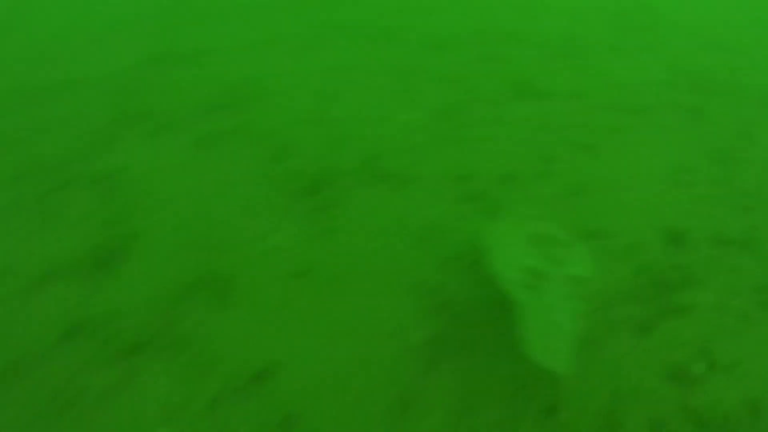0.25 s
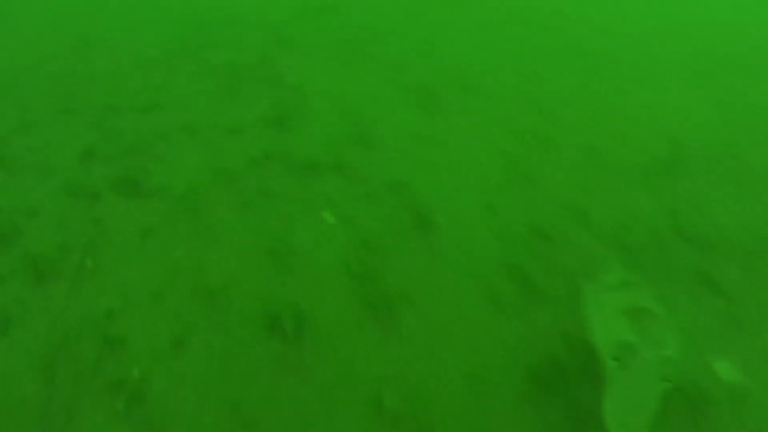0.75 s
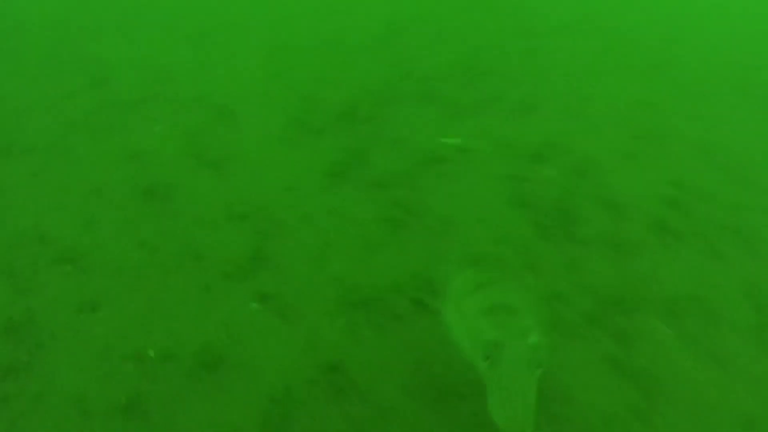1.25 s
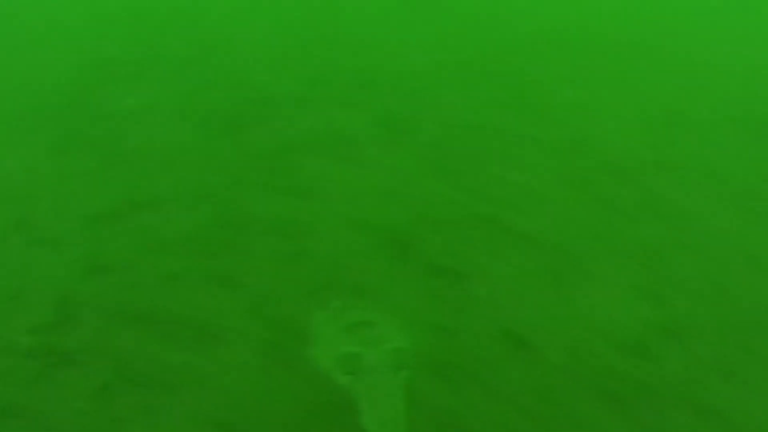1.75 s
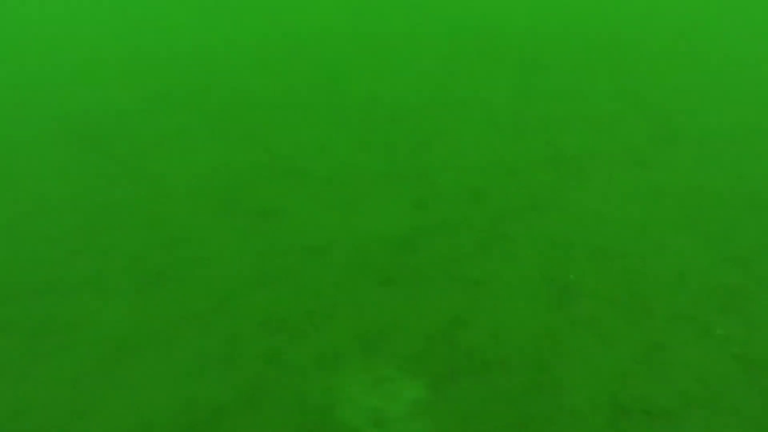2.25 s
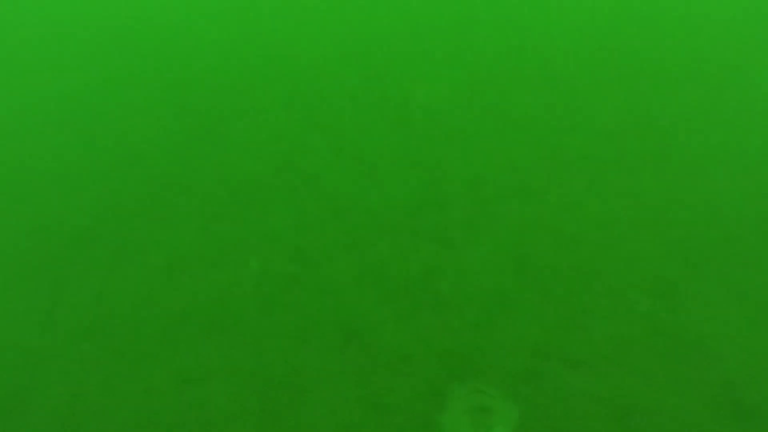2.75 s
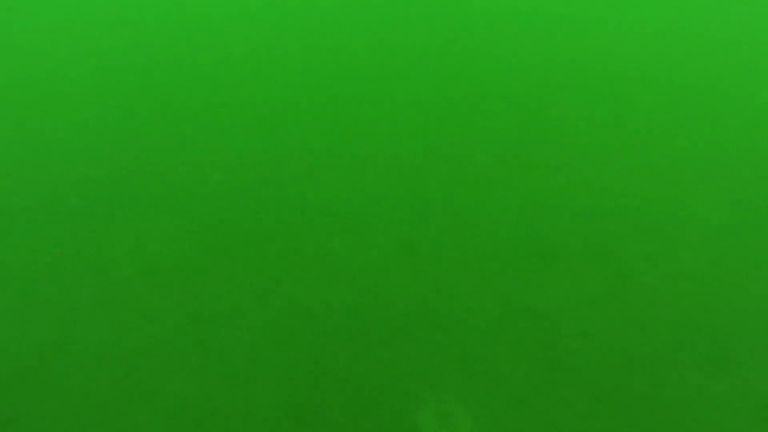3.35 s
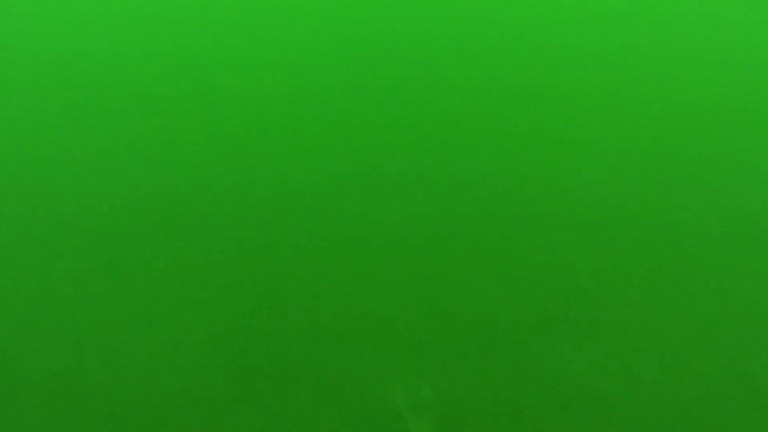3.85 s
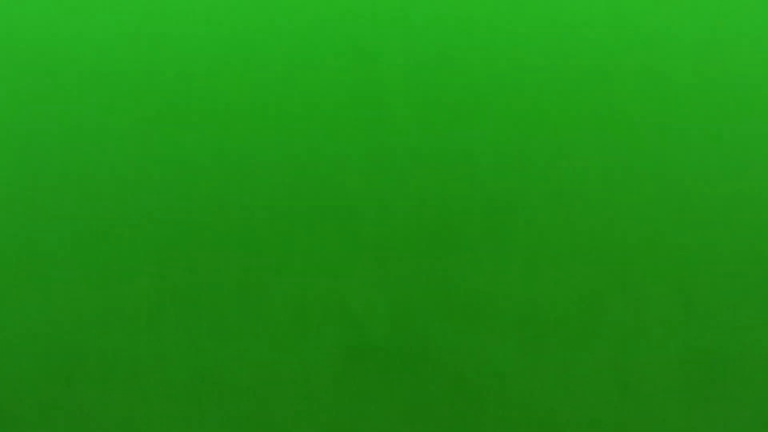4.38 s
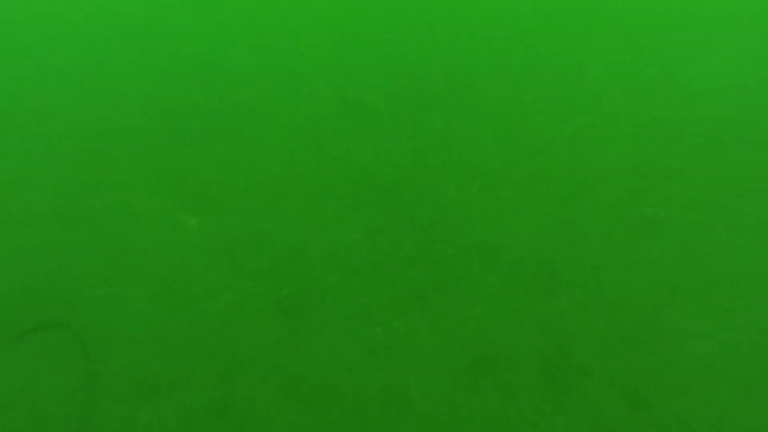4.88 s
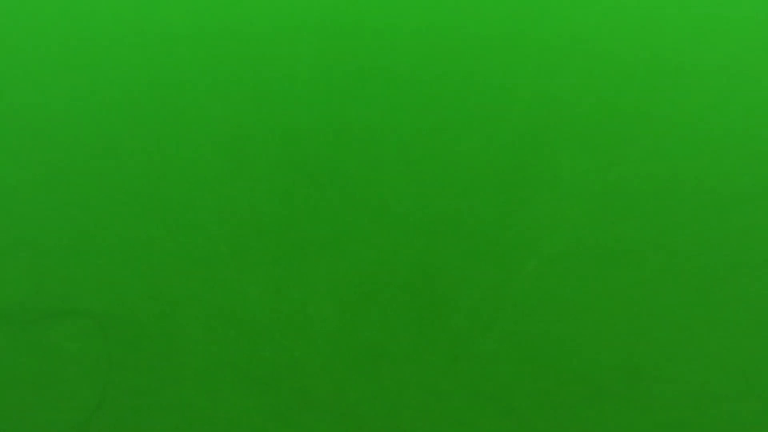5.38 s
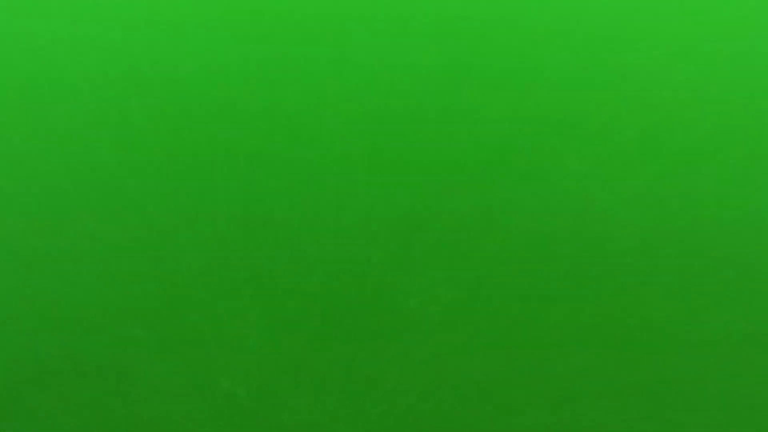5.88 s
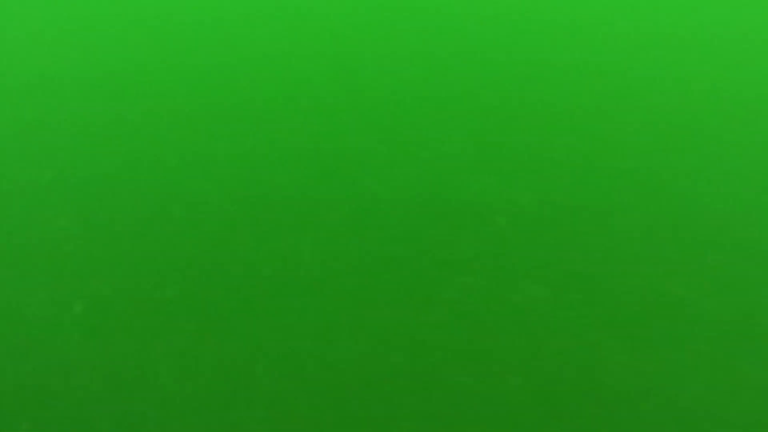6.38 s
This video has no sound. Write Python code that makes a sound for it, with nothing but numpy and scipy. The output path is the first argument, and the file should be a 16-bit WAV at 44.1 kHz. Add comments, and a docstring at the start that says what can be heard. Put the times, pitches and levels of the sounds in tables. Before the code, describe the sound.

Fast hollow diesel clatter heard beneath the sea, joined after four seconds by a rushing propeller wash that fades near the end.

```python
"""Under the sea, below a boat: from the start a six-cylinder diesel idles, each firing knocking through the hull.
It is built from short rings over noise; low tones hum along, small bright pings come and go, electronics hiss.
After four seconds a thruster propeller spins up: shaped noise churns low, and bubbles crackle above it.
It loads up, slaps and washes, is switched off just under two seconds later and fades; the diesel goes on.
Engine and propeller reach two microphones through the ringing walls of a sealed camera housing."""
import sys
import numpy as np
from scipy import signal
from scipy.fft import rfft, irfft, next_fast_len
from scipy.io import wavfile
from scipy.ndimage import map_coordinates

SR = 44100
rng = np.random.default_rng(int(sys.argv[2]) if len(sys.argv) > 2 else 0)


def log_audio(samples):
    """Write samples as a 16-bit WAV file to the path given in sys.argv[1]."""
    # one column per channel
    frames = np.atleast_2d(samples).T
    # limit to full scale, then quantise
    limited = np.clip(frames, -1, 1)
    pcm = np.round(limited * 32767).astype(np.int16)
    wavfile.write(sys.argv[1], SR, pcm)


N = 291942  # samples
SECONDS = np.arange(N) / SR


def amp(db):
    """Turn decibels into a factor."""
    return 10 ** (np.asarray(db) / 20)


def along(points, hz):
    """Read a curve of (Hz, value) points, joined on a logarithmic frequency axis."""
    point_hz, values = np.transpose(points)
    return np.interp(np.log(hz + 1), np.log(point_hz + 1), values)


def curves(rows):
    """Draw one curve over time for each column after the seconds."""
    s, *columns = np.transpose(rows)
    return [np.interp(SECONDS, s, column) for column in columns]


def wobble(rate):
    """A smooth random curve through `rate` random points a second."""
    return map_coordinates(rng.standard_normal(N // 100), [np.arange(N) * rate / SR])


def filtered(x, response):
    """Multiply the spectrum of x by a response that depends on frequency."""
    size = next_fast_len(N + SR // 4)
    return irfft(rfft(x, size) * response(np.fft.rfftfreq(size, 1 / SR)), size)[..., :N]


def mode(f, centre_hz, width_hz):
    """Response of one damped resonance, 1 at its top."""
    return 1j * f * width_hz / (centre_hz ** 2 - f * f + 1j * f * width_hz)


def peaks_and_dips(f, rows):
    """A flat response with resonances added (peaks) or taken away (dips)."""
    return 1 + sum(gain * mode(f, centre_hz, width_hz) for centre_hz, width_hz, gain in rows)


# How far the crankshaft has turned. Each row: time in seconds, firings counted so far.
CRANKSHAFT = [(0, -.32), (3.05, 91.14), (3.3, 98.43), (3.6, 107.01), (4.2, 124.61), (5.4, 159.68),
              (6.62, 196)]
# The six parts of a firing: thud, thump, boom, clank, knock, tick.
# Each row: centre in Hz, width in Hz, lag in firings (negative is early), rise in seconds.
FIRING_PARTS = [(340, 250, .0, .004), (700, 150, -.27, .004), (990, 280, -.28, .0027),
                (1580, 300, -.2, .0025), (2340, 330, -.25, .0019), (3400, 500, -.23, .0015)]
# The cylinders in firing order. Each row: base levels in dB of thud, thump, boom, clank, knock, tick.
CYLINDER_LEVELS = [(-.5, 7.5, -1, 5.5, 13.5, 8), (4.5, 2, -4, 8.5, 5, 7), (4.5, 1, 6.5, 3.5, 5.5, 5),
                   (4.5, 7, 9.5, 7, 9, 5), (6.5, 4, 5.5, 3, 7, 4), (6.5, 7, 7.5, 3, 3.5, 5)]
# How late each cylinder sounds. Each row: delays in firings of thud, thump, boom, clank, knock, tick.
CYLINDER_DELAYS = [(0, 0, 0, .1, 0, 0), (0, .1, .1, .05, .03, 0), (0, .1, .1, .05, 0, 0),
                   (0, .13, .12, .05, .11, .05), (0, 0, .08, .05, 0, 0), (0, .05, .1, .1, .05, 0)]
# Firings that boom harder or softer than their cylinder usually does. Each row: time in seconds, extra dB.
UNEVEN_FIRINGS = [(.111, 3.5), (.274, 2), (.31, 3.5), (.377, 2), (.409, 2), (.445, -6), (.477, 1),
                  (.511, 4), (.542, 2), (.575, 2), (.709, 1.5), (.776, 2), (.944, 2), (1.013, -3),
                  (1.071, 2), (1.113, 1), (1.453, 2), (1.54, 3), (1.741, 2), (1.911, 2), (2.108, 1),
                  (2.278, 1), (2.678, 1), (2.915, 3), (3.078, 2), (3.176, 2), (3.25, -3), (3.283, 2),
                  (3.316, -.7), (3.388, 3), (3.495, 2), (3.528, 2), (3.597, 3), (3.63, -3), (3.703, 3.5),
                  (3.734, -1.5), (3.908, .7), (3.94, 2), (3.975, -4), (4.006, 2), (4.11, 3), (4.145, -2),
                  (4.21, -2), (4.28, -3), (4.35, -3)]
# The engine as the camera drifts and turns. Each row: time in seconds, drone level in dB before tone shaping,
# lift of the boom in dB, change of rumble and knock in dB.
ENGINE_LEVELS = [(0, -37.3, 0, 0), (.6, -37.6, 0, 0), (1.5, -38.3, -4, .5), (2.5, -39.7, -2.5, .5),
                 (3.1, -39.6, 2, -1), (4, -38.8, 3, 0), (6.1, -37.3, -2, -2.5), (6.62, -37.8, -1, -3.5)]
# Tone of the engine in the water. Each row: frequency in Hz, level in dB.
ENGINE_TONE = [(60, -5), (120, -2.5), (200, -3), (320, -6.5), (500, 2.3), (800, -2), (1300, 5.2),
               (1800, 5.5), (2300, 2.3), (3200, 3), (5000, -5), (7500, -4), (11000, -5.8)]
# Narrow peaks and dips in the engine's tone. Each row: centre in Hz, width in Hz, gain as a factor (dips negative).
ENGINE_PEAKS_AND_DIPS = [(140, 20, .3), (480, 120, .15), (590, 60, -.3), (1570, 150, -.15), (2040, 120, .6),
                         (2540, 140, -.3), (2830, 130, .35), (3150, 200, -.2)]
RUMBLE_DB, KNOCK_DB, RATTLE_DB = -37.3, -36.3, -36.5  # base levels that do not follow the drone
GROAN_FROM_DB, GROAN_GROWS = -40.3, 1.2  # groan stands out this many dB per dB of drone above that level


def diesel():
    """Each firing rings briefly in several hull plates, over the drone of echoes between surface and bottom."""
    turn, = curves(CRANKSHAFT)
    drone_db, boom_db, change_db = curves(ENGINE_LEVELS)
    rumble_db = RUMBLE_DB + change_db - drone_db
    knock_db = KNOCK_DB + change_db - drone_db
    groan_db = GROAN_GROWS * (drone_db - GROAN_FROM_DB)
    rattle_db = RATTLE_DB - drone_db
    period = 1 / (SR * np.gradient(turn))  # seconds from one firing to the next

    # The drone; its loudness still follows the firings, as near echoes do.
    beat_db = 1.5 * np.cos(2 * np.pi * (turn - .05))
    drone = amp(beat_db + .4 * wobble(30)) * rng.standard_normal(N)
    sound = drone
    for lift_db, centre_hz, width_hz in [(rumble_db, 170, 250), (groan_db, 720, 160), (rattle_db, 2870, 400)]:
        sound = sound + (amp(lift_db) - 1) * filtered(drone, lambda f: mode(f, centre_hz, width_hz))
    sound = sound - .15 * filtered(drone, lambda f: mode(f, 2340, 330))  # quiet between the knocks

    # The firings; every part of each one is a little different by chance.
    chance = rng.standard_normal((int(turn[-1]) + 4, len(FIRING_PARTS), 3))
    uneven_db = np.zeros(len(chance))
    for s, db in UNEVEN_FIRINGS:
        uneven_db[round(turn[round(s * SR)]) + 1] = db
    part_lift_db = [rumble_db, boom_db / 2, boom_db, boom_db / 2, knock_db, knock_db]
    for k, (centre_hz, width_hz, lag, rise) in enumerate(FIRING_PARTS):
        firing = np.floor(turn - lag).astype(int)
        cylinder = firing % len(CYLINDER_LEVELS)
        delay = np.array(CYLINDER_DELAYS)[cylinder, k]
        since = np.clip(turn - lag - firing - delay, 0, None) * period
        strength, detune, phase = chance[firing + 1, k].T
        level_db = np.array(CYLINDER_LEVELS)[cylinder, k] + part_lift_db[k]
        level_db = level_db + (.8 + .6 * (centre_hz > 2000)) * strength
        level_db = level_db + uneven_db[firing + 1] * (600 < centre_hz < 2000)
        swell = since / rise * np.exp(1 - since / rise)
        ring = np.sin(2 * np.pi * ((centre_hz + .07 * width_hz * detune) * since + phase))
        drone_in_band = np.sqrt(2 * width_hz / SR)  # each part is sized against the drone inside its band
        sound = sound + amp(level_db) * drone_in_band * swell * ring
    tone = lambda f: amp(along(ENGINE_TONE, f)) * peaks_and_dips(f, ENGINE_PEAKS_AND_DIPS)
    return filtered(amp(drone_db) * sound, tone)


# Steady tones pressing on the housing. Each row: multiple of the firing rate, middle peak level in dB.
HUM_TONES = [(2, -84), (3, -85), (6.67, -79)]


def hum():
    """Low engine orders, each wavering a little, and not quite alike at the two sides."""
    turn, = curves(CRANKSHAFT)
    sound = np.zeros((2, N))
    for order, db in HUM_TONES:
        drift = .1 * wobble(3) + .05 * np.array([wobble(4), wobble(4)])
        sound = sound + amp(db + 2 * wobble(5)) * np.sin(2 * np.pi * (order * turn + drift))
    return sound


# Resonances of the housing, felt by each microphone with its own strength and sign.
# Each row: centre in Hz, width in Hz, left gain as a factor, right gain as a factor.
HOUSING_MODES = [(201, 86, -0.624, -0.417), (289, 87, -0.997, -0.627), (327, 31, 0.0573, 0.105),
                 (385, 74, 0.736, 0.142), (535, 132, 0.676, -1.09), (682, 86, 0.843, -6.15),
                 (766, 103, 6.55, -3.12), (782, 230, -15.1, 8.41), (878, 527, 9.24, -0.0592),
                 (1021, 97, -2.46, -6.38), (1123, 229, -3.83, 0.0748), (1520, 334, -1.45, 2.68),
                 (1618, 306, 3.99, -3.2), (1671, 406, -3.1, 0.394), (2113, 263, 0.581, -0.355),
                 (2224, 313, -0.648, 0.00446), (2235, 135, 0.515, 0.396), (2454, 179, -0.22, -0.181),
                 (2719, 235, -0.138, -0.0233), (3012, 293, -0.0678, -0.0803), (3422, 269, 0.0307, -0.0099),
                 (4052, 419, 0.107, 0.0382), (4217, 2099, -0.304, -0.0782), (4471, 1099, 0.192, 0.0295),
                 (5667, 1256, 0.203, 0.139), (5875, 984, -0.153, -0.138), (6700, 116, -0.00501, -0.00803),
                 (7205, 295, 0.00385, 0.00391), (7320, 4336, -0.00656, -0.00644),
                 (9587, 451, -0.0115, -0.0104)]
# Late scattered sound against direct sound. Each row: frequency in Hz, late over direct in dB.
SCATTER_SHARE = [(60, -5), (150, -17), (1000, -14), (2500, -7), (5000, -1), (10000, -3.5)]


def housing(water):
    """The walls ring and carry the sound to both microphones; late scattered sound differs between them."""
    t = np.arange(SR // 8) / SR
    hop = SR // 10
    late = np.zeros((2, N + 4 * hop + len(t)))
    padded = np.pad(water, 2 * hop)
    # Fresh random tails, overlapped ten times a second, keep the scattered sound from ringing evenly.
    for start in range(-hop, N, hop):
        tails = rng.standard_normal((2, len(t))) * amp(-60 * t / .15)
        tails = tails / np.linalg.norm(tails[0])
        piece = padded[start + 2 * hop:][:2 * hop] * np.sqrt(np.hanning(2 * hop))
        echoes = signal.fftconvolve(piece[None], tails, axes=1)
        late[:, start + hop:][:, :2 * hop + len(t) - 1] += echoes
    share = lambda f: amp(along(SCATTER_SHARE, f))
    direct = filtered(water, lambda f: 1 / np.sqrt(1 + share(f) ** 2))
    scattered = filtered(late[:, hop:hop + N], lambda f: share(f) / np.sqrt(1 + share(f) ** 2))
    walls = lambda f: sum(np.array([[left], [right]]) * mode(f, centre_hz, width_hz)
                          for centre_hz, width_hz, left, right in HOUSING_MODES)
    return filtered(direct + scattered, walls)


# Tone of the electronics. Each row: frequency in Hz, level in dB.
HISS_TONE = [(25, -70), (45, -68), (80, -63), (160, -59), (2000, -62), (4000, -65.5), (7000, -69),
             (11000, -71)]


def hiss(shared):
    """Amplifier noise; `shared` sets how alike the two channels are, from 0 to 1."""
    a, b = rng.standard_normal((2, N))
    angle = np.arccos(np.clip(shared, 0, 1)) / 2
    pair = np.array([np.cos(angle) * a + np.sin(angle) * b, np.cos(angle) * a - np.sin(angle) * b])
    return filtered(pair, lambda f: amp(along(HISS_TONE, f)))


# Small bright ticks. Each row: start in seconds, peak level in dB midway between the sides, pitch in Hz.
TICK_PINGS = [(0.2074, -60, 3350), (0.7437, -62, 3350), (0.8375, -66, 3290), (0.9408, -65, 3410),
              (1.04, -59, 3380), (1.1727, -64, 3360), (1.2735, -65, 3360), (1.4072, -61, 3350),
              (1.506, -66, 3400), (2.2727, -64, 3400), (2.4399, -65, 3380), (2.6065, -67, 3320),
              (3.0071, -63, 3410), (3.1058, -66, 3390), (3.2111, -65, 3540), (3.244, -62, 3350),
              (3.2784, -62, 3350), (3.5942, -63, 3560), (3.6965, -65, 3320), (3.7923, -66, 3500),
              (3.8317, -63, 3390), (4.0043, -62, 3540)]


def ticks():
    """Bright pings of loose metal, shaken by some of the firings; each swells and dies within milliseconds."""
    sound = np.zeros(N)
    t = np.arange(SR // 50) / SR
    for s, db, hz in TICK_PINGS:
        swell = t / .002 * np.exp(1 - t / .002)
        sound[round(s * SR):][:len(t)] += amp(db) * swell * np.sin(2 * np.pi * hz * t)
    return sound * amp([[1.5], [-1.5]])  # dB for left and right


THRUST_ON_S, THRUST_OFF_S = 4.42, 6.15  # up to speed, switched off
SPIN_UP_DB_PER_S, CHURN_STEEPER = 88, 1.8  # the churn follows spin-up more steeply than the bubbles
BITE_DB, BITE_S = 6.5, .55  # the blades load up slowly once turning
SURGE_DB, SURGE_S = 1.5, .06  # a last surge just before switch-off
CHURN_DB, CAVITATION_DB = -20.5, -23  # at full load, before tone shaping
CHURN_CUT_DB, CHURN_CUT_S, CHURN_FADE_DB_PER_S = 13, .03, 130  # after switch-off
COAST_DB, COAST_S, BUBBLE_FADE_DB_PER_S, STOP_DB = 3, .1, 60, 5  # first drop, coasting time, fade, drop at stop
TILT_DB, START_TILT_DB, TILT_S = .1, 1.7, .35  # per octave: under load, extra while blades slip, settling time


def thrust():
    """Spin-up, loading and run-down: churn dB, cavitation dB, brightness in dB per octave."""
    early = np.maximum(THRUST_ON_S - SECONDS, 0)
    running = np.maximum(SECONDS - THRUST_ON_S, 0)
    late = np.maximum(SECONDS - THRUST_OFF_S, 0)
    step = lambda since: np.clip(since / CHURN_CUT_S, 0, 1)
    surge_db = SURGE_DB * (step(SECONDS - THRUST_OFF_S + SURGE_S) - step(late))
    load_db = surge_db - BITE_DB * np.exp(-running / BITE_S)

    churn_db = CHURN_DB + load_db - CHURN_STEEPER * SPIN_UP_DB_PER_S * early
    churn_db = churn_db - CHURN_CUT_DB * step(late) - CHURN_FADE_DB_PER_S * late
    cavitation_db = CAVITATION_DB + load_db - SPIN_UP_DB_PER_S * early - BUBBLE_FADE_DB_PER_S * late
    cavitation_db = cavitation_db - COAST_DB * step(late) - STOP_DB * step(late - COAST_S)
    brightness = TILT_DB + START_TILT_DB * np.exp(-(running + 2 * early) / TILT_S)
    return churn_db, cavitation_db, brightness


# Tone of the thruster in the water. Each row: frequency in Hz, level in dB.
PROPELLER_TONE = [(60, -14.1), (120, -4.4), (200, 1.0), (320, -2.1), (500, -2.6), (800, -3.9), (1300, -1.6),
                  (2000, 0.3), (3200, -0.9), (5000, -0.4), (7500, -2.4), (11000, -1.3)]
# Narrow peaks and dips in the thruster's tone.
# Each row: centre in Hz, width in Hz, gain as a factor (dips negative).
THRUSTER_PEAKS_AND_DIPS = [(198, 22, .55), (232, 40, -.3), (295, 40, .25), (450, 40, -.2), (540, 110, .4),
                           (700, 40, .4), (765, 60, -.35), (885, 50, .3), (2010, 120, .5), (2430, 130, .8),
                           (2800, 120, -.45), (3250, 200, -.3), (3650, 200, .3), (5630, 250, .3),
                           (6370, 200, -.45), (9500, 300, .3)]
# Bands that hiss while the blades still slip. Each row: centre in Hz, width in Hz.
SLIP_BANDS = [(500, 200), (1320, 450)]
# Lift of two bands. Each row: time in seconds, narrow ring above 2 kHz in dB, boom in dB.
RING_AND_BOOM = [(4.2, 3, 0), (4.42, -1.5, 0), (4.8, -1.5, -1.2), (5.2, 1.5, 1), (5.7, 1, 1.2),
                 (6, -2, -.5), (6.62, -4, 0)]
CHURN_TOP_HZ = 470
DEEP_HZ, DEEP_LATE_DB, DEEP_FROM_S = 190, 7, 4.95  # deepest churn is full only once the flow is established
SLIP_DB, SLIP_UNTIL_S, SLIP_FADE_DB_PER_S = 1.5, 5.0, 40
LINGER_HZ, LINGER_DB, LINGER_S = 1000, 5, .07  # the boom of the bubbles outlasts the switch-off


def thruster():
    """Water churns low in the tunnel; vapour bubbles collapse in uneven clouds above it."""
    churn_db, cavitation_db, brightness = thrust()
    clouds = wobble(70)

    unsteady_churn_db = churn_db + .7 * clouds + 1.5 * wobble(30) + .6 * wobble(6)
    churn = amp(unsteady_churn_db) * rng.standard_normal(N)
    low = lambda f: 1 / np.sqrt(1 + (f / CHURN_TOP_HZ) ** 8)
    settled = np.clip((SECONDS - DEEP_FROM_S) / .15 + 1, 0, 1)
    held_back = churn * (amp(DEEP_LATE_DB * (settled - 1)) - 1)  # takes away the deepest churn at first
    deep = filtered(held_back, lambda f: 1 / (1 + (f / DEEP_HZ) ** 6))
    sound = filtered(churn + deep, low)

    for octave, (centre_hz, unsteady_db) in enumerate([(800, .9), (1600, 1.3), (3200, 1.3), (6400, 1.1)]):
        collapses = amp(2.2 * rng.standard_normal(N)) * rng.standard_normal(N)  # many sizes of click
        flicker_db = unsteady_db * (.7 * clouds + .7 * wobble(40))
        level = amp(cavitation_db + brightness * octave + flicker_db)
        octaves_away = lambda f: np.log2(np.clip(f, 800, 6400) / centre_hz)
        band = lambda f: np.exp(-octaves_away(f) ** 2 / .7) * np.sqrt(1 - low(f) ** 2)
        sound = sound + filtered(level * collapses, band)

    slip_db = SLIP_DB - SLIP_FADE_DB_PER_S * np.clip(SECONDS - SLIP_UNTIL_S, 0, None)
    slip = amp(cavitation_db + slip_db + clouds) * rng.standard_normal(N)
    sound = sound + filtered(slip, lambda f: sum(mode(f, c, w) for c, w in SLIP_BANDS))

    ring_db, boom_db = curves(RING_AND_BOOM)
    late = np.clip(SECONDS - THRUST_OFF_S, 0, None) / LINGER_S
    boom_db = boom_db + LINGER_DB * late * np.exp(1 - late)
    sound = sound + (amp(ring_db) - 1) * filtered(sound, lambda f: mode(f, 2350, 450))
    sound = sound + (amp(boom_db) - 1) * filtered(sound, lambda f: mode(f, LINGER_HZ, 600))
    tone = lambda f: amp(along(PROPELLER_TONE, f)) * peaks_and_dips(f, THRUSTER_PEAKS_AND_DIPS)
    return filtered(sound, tone)


WASH_DB, WASH_HZ = -54, 32  # noise level under full load before the filter, centre of its band


def wash():
    """The stream from the tunnel rocks the housing in lumps, differently at each side."""
    lumps_db = 4.5 * np.array([wobble(6), wobble(6)])
    _, cavitation_db, _ = thrust()
    flow = amp(cavitation_db - CAVITATION_DB + WASH_DB + lumps_db) * rng.standard_normal((2, N))
    return filtered(flow, lambda f: mode(f, WASH_HZ, 35))


# Large vapour clouds collapse. Each row: start in seconds, level in dB before the rise and fall shape it.
CLOUD_COLLAPSES = [(4.604, -15), (4.645, -15), (4.685, -14), (4.865, -15), (4.999, -14), (5.068, -13),
                   (5.136, -13), (5.252, -14), (5.293, -11), (5.331, -12), (5.371, -11), (5.402, -13),
                   (5.565, -13), (5.605, -12), (5.645, -12), (5.693, -11), (5.797, -13), (5.822, -13),
                   (5.859, -11), (5.879, -11), (5.901, -10), (5.939, -13), (5.981, -13), (6.112, -10),
                   (6.131, -10)]
BURST_RISE_S, BURST_FALL_S = .001, .004


def bursts():
    """Collapsing clouds give short slaps of noise in the middle register."""
    swell = np.zeros(N)
    for s, db in CLOUD_COLLAPSES:
        since = np.clip(SECONDS - s, 0, None)
        swell += amp(db) * (1 - np.exp(-since / BURST_RISE_S)) * np.exp(-since / BURST_FALL_S)
    return filtered(swell * rng.standard_normal(N), lambda f: mode(f, 950, 1000))


def scene():
    """Sounds in the water pass through the housing; pings, hum and wash are added directly."""
    water = diesel() + thruster() + bursts()
    return housing(water) + ticks() + hum() + wash()


TOP_HZ = 11160


def record(dry):
    """Amplifier hiss is added, then a very steep filter removes what lies above the band limit."""
    return filtered(dry + hiss(shared=.45), lambda f: 1 / (1 + (f / TOP_HZ) ** 400))


dry = scene()
out = record(dry)
log_audio(out)
```